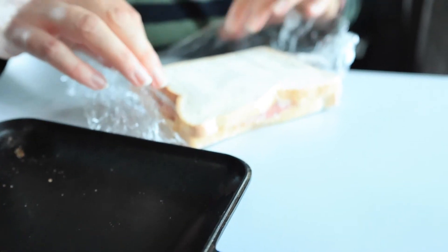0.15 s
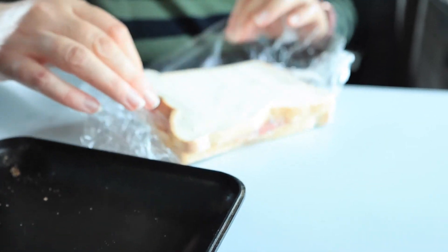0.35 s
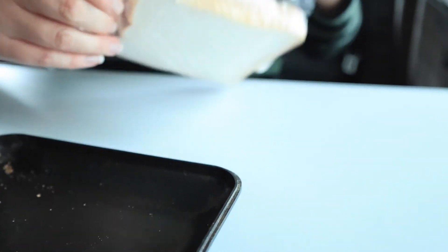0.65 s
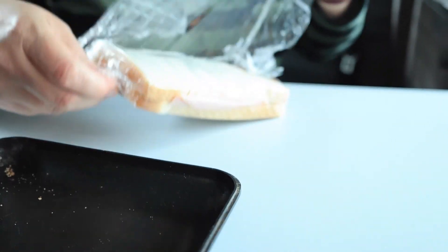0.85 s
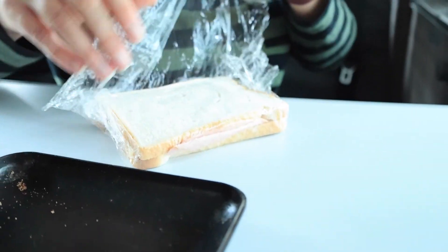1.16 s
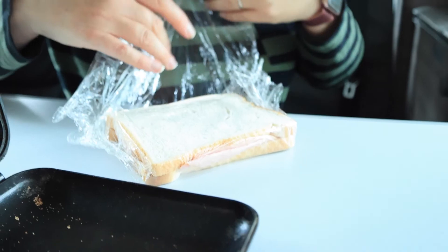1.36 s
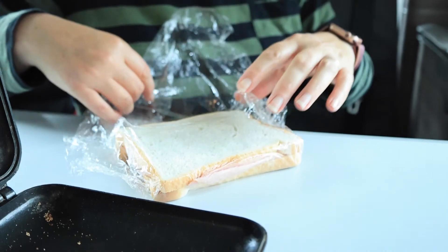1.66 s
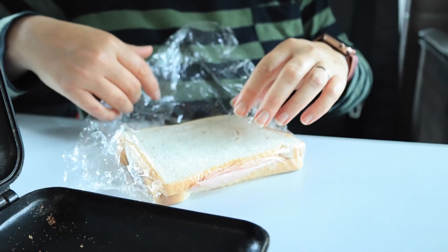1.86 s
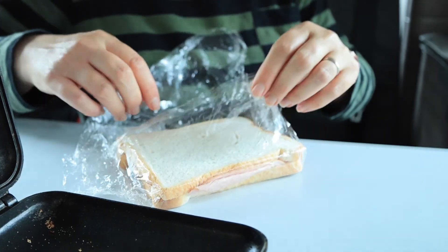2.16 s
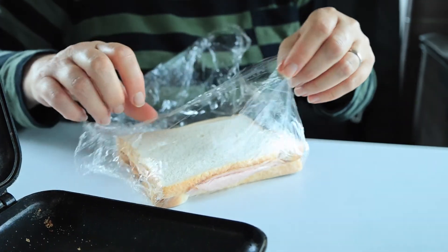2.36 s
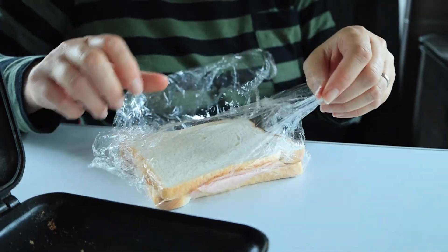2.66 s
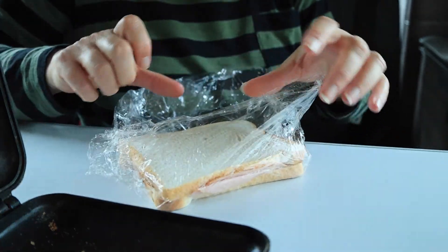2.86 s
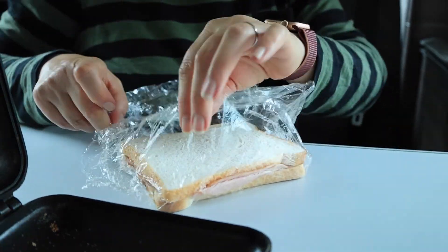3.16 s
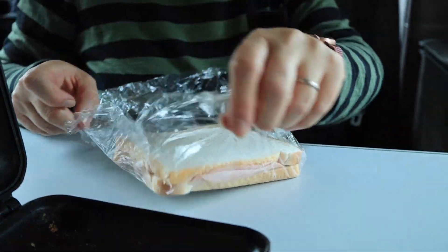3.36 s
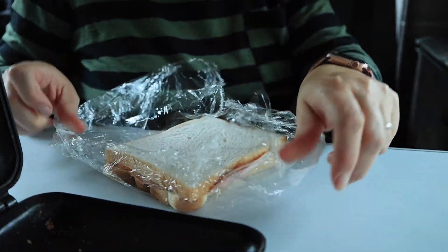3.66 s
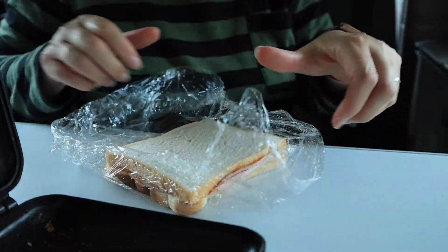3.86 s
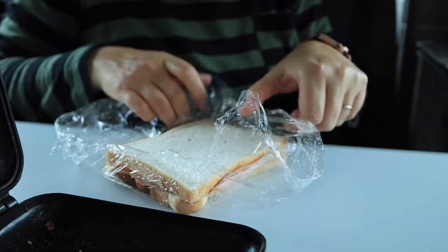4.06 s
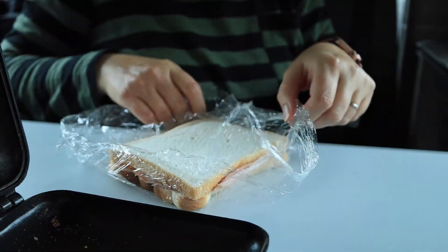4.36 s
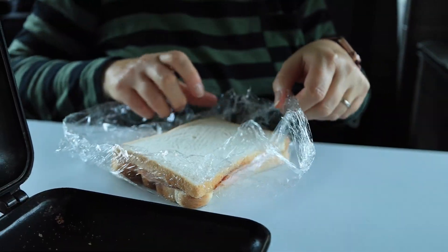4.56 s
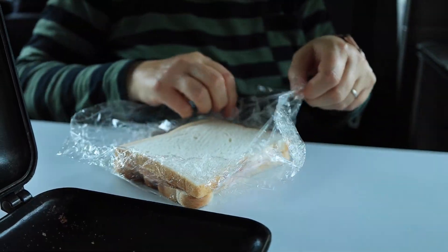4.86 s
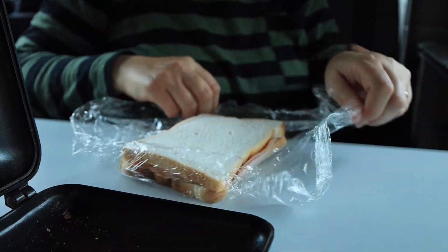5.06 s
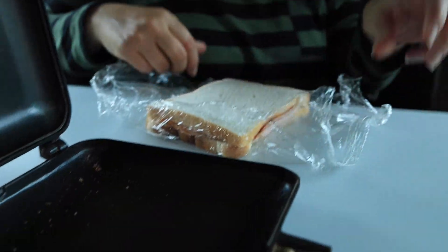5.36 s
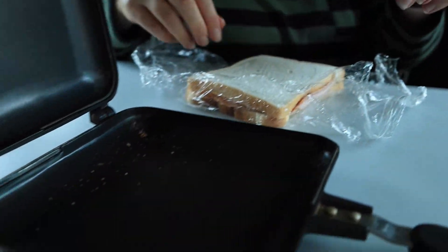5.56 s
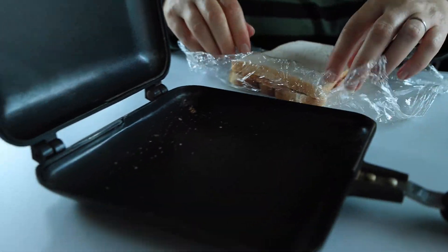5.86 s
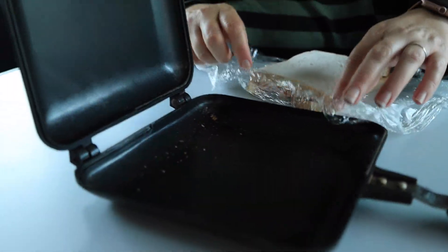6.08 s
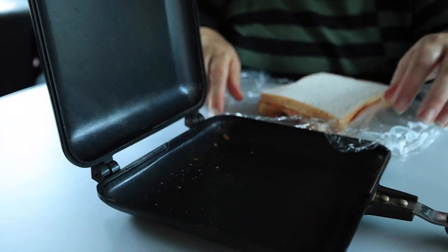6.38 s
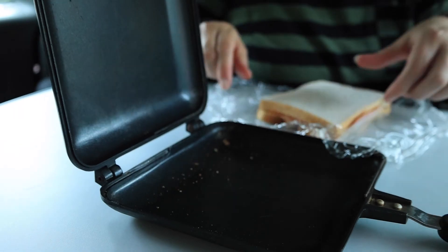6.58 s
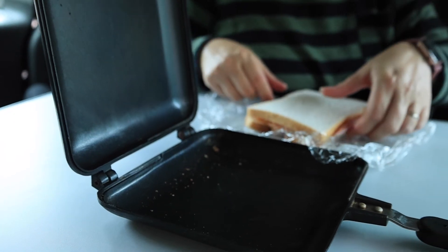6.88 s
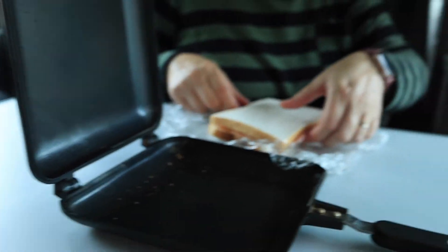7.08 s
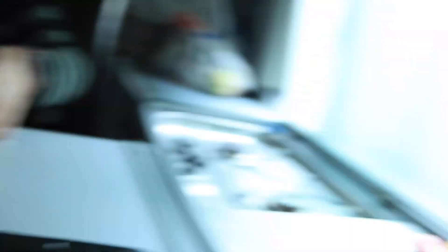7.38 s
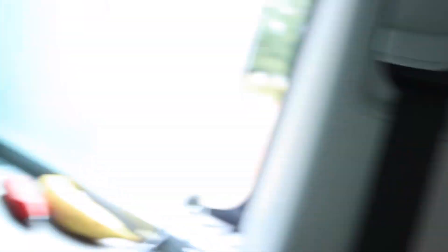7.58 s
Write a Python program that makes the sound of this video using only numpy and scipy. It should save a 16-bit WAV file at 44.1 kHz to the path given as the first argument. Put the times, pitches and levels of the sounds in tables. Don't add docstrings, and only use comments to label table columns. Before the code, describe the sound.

Crisp plastic film rustles in uneven tugs, with single creases popping brightly over the swarm of tiny crackles. An early thud on the table, a loud double snap past the middle, then quieter fumbling, a strong bump with a short drag, and a late catch clicking. Near, dry indoor sound; soft fan hush, with low bumps from fingers shifting on the microphone.

```python
import sys
import numpy as np
from scipy import signal
from scipy.fft import rfft, irfft
from scipy.io import wavfile
from scipy.ndimage import uniform_filter1d

SR = 44100
rng = np.random.default_rng(int(sys.argv[2]) if len(sys.argv) > 2 else 0)


def volts_from_db(level):
    exponent = np.asarray(level, float) / 20
    return 10 ** exponent


def dump(signal):
    limited = np.clip(np.atleast_2d(signal).T, -1, 1)
    pcm = np.round(limited * 32767).astype(np.int16)
    wavfile.write(sys.argv[1], SR, pcm)


N = 340628


def unit(x):
    return x / np.sqrt(np.mean(x ** 2))


def band(x, lo_hz, hi_hz, order=2):
    edges_hz = [lo_hz, min(hi_hz, .45 * SR)]
    return signal.sosfilt(signal.butter(order, edges_hz, "band", fs=SR, output="sos"), x)


def noise(n=N):
    return rng.standard_normal(n)


def curves(table):
    s, *columns = np.transpose(table)
    return [np.interp(np.arange(N) / SR, s, c) for c in columns]


def gestures(table):
    swing_db = 20
    t = np.arange(0, N / SR, .001)
    power = 0
    for s, hold, db, rise, fall in table:
        distance = np.maximum(s - t, 0) / rise + np.maximum(t - s - hold, 0) / fall
        power = power + volts_from_db(db - swing_db * distance) ** 2
    return np.interp(np.arange(N) / SR, t, np.sqrt(power))


def colour(x, spectrum):
    hz, db = np.transpose(spectrum)
    bins_hz = np.fft.rfftfreq(2048, 1 / SR)
    log_gain = np.interp(np.log(bins_hz + 1), np.log(hz), db) * np.log(10) / 20
    cepstrum = irfft(log_gain)
    cepstrum[1:1024] *= 2
    cepstrum[1025:] = 0
    return signal.fftconvolve(x, irfft(np.exp(rfft(cepstrum))))[:len(x)]


def walk(rate):
    k = int(SR / rate)
    steps = np.repeat(noise(N // k + 1), k)
    return unit(uniform_filter1d(uniform_filter1d(steps, k), k)[:N])


def fade(t60):
    t = np.arange(int(.3 * SR)) / SR
    return t, np.exp(-np.log(1000) * t / t60)


def ring(push, modes, shorten=1):
    t = fade(1)[0]
    body = 0
    for k, (hz, db, t60) in enumerate(modes):
        mode = np.sin(2 * np.pi * hz * t) * fade(t60 * shorten)[1]
        body = body + (-1) ** k * volts_from_db(db) * mode
    return signal.fftconvolve(push, body)[:len(t)]


def add(out, s, db, wave):
    i = int(s * SR)
    part = wave[:N - i]
    out[i:i + len(part)] += part * volts_from_db(db) / np.abs(wave).max()


def swarm(per_s, spread_db):
    size = volts_from_db(spread_db * np.minimum(rng.exponential(size=N), 3))
    return unit((rng.random(N) < per_s / SR) * np.sign(noise()) * size)


# frequency in Hz, density in dB per Hz.
HUSH_SPECTRUM = [(71, -19), (120, -10), (295, -9), (742, -7), (1070, -9.5), (1490, -7.5), (1750, -4.5),
                 (2290, -15.5), (7200, -27), (9590, -26), (16000, -34)]
# frequency in Hz, width in Hz, level in dB.
MOTOR_WHINES = [(3930, 350, -64), (9630, 220, -71.5)]


def air():
    sound = unit(colour(noise(), HUSH_SPECTRUM)) * volts_from_db(-44.5)
    fan = (1744, 236, -48.5 + .5 * walk(3.95))  # Hz, width Hz, unsteady dB
    for hz, width, db in MOTOR_WHINES + [fan]:
        sound = sound + volts_from_db(db) * unit(band(noise(), hz - width / 2, hz + width / 2))
    return sound


# start of full strength in seconds, hold in seconds,
# rumble level in dB, rise in seconds, fall in seconds.
GRIP_SHIFTS = [(0.46, 0.11, -34, .17, 0.29), (0.82, .01, -39, .3, 0.66), (1.7, .01, -52, .5, .1),
               (2.9, .01, -46, 0.23, 0.17), (3.67, .01, -48, 0.26, .5), (4.49, .01, -54, 0.43, 0.54),
               (5.25, 0.026, -37, 0.28, .22), (5.68, .01, -46.5, .5, 0.87), (6.32, .01, -50, 0.71, .6),
               (7.185, 0.12, -29, 0.049, 0.09), (7.46, 0.058, -30, .1, 0.17), (7.7, .03, -31.5, .3, 0.07)]


def grip(pull):
    hold_db, sway_db, drone_db = -62, -45, -49
    drone_shift_db, drone_pull_db = -16.5, -14
    shift = gestures(GRIP_SHIFTS)
    rumble = np.hypot(shift, volts_from_db(hold_db)) * unit(band(noise(), 27.7, 55, order=3))
    sway = volts_from_db(sway_db) * unit(band(noise(), 12.8, 19.9, order=3))
    moving = np.hypot(volts_from_db(drone_shift_db) * shift, volts_from_db(drone_pull_db) * pull)
    drone = np.hypot(volts_from_db(drone_db), moving) * unit(band(noise(), 57, 188.0))
    return rumble + sway + drone


# start of full strength in seconds, hold in seconds,
# rustle level in dB, rise in seconds, fall in seconds.
EDGE_FUMBLES = [(0.0, .01, -44.5, .01, .35), (0.18, 0.24, -50, 0.067, .1), (1.45, 0.25, -45, 0.15, .12),
                (1.95, .01, -49, 0.033, 0.2), (3.16, .01, -48, 0.13, 0.088), (4.03, 0.29, -49.5, .02, .1),
                (4.37, .03, -47.5, 0.14, .9), (5.85, 0.27, -46, 0.011, .1), (6.47, 0.032, -60, .1, .2),
                (6.756, 0.0084, -45.5, 0.058, 0.057), (6.865, 0.008, -45, .12, 0.054),
                (6.96, 0.096, -48.5, .1, 0.092), (7.16, .01, -48, 0.092, .2), (7.4, .01, -43, 0.29, 0.13),
                (7.65, 0.09, -47, 0.27, .1)]


def fumbling():
    return gestures(EDGE_FUMBLES)


# start of full strength in seconds, hold in seconds,
# rustle level in dB, rise in seconds, fall in seconds.
FIRM_PULLS = [(0.32, .01, -39, .01, .05), (0.375, .01, -36, .02, .1), (0.412, 0.015, -35, 0.022, 0.34),
              (0.571, .01, -29, 0.01, 0.2), (0.634, 0.004, -27, .006, 0.036), (0.71, .11, -29, 0.15, .04),
              (0.83, 0.11, -33, .03, 0.05), (1.07, 0.035, -33.5, 0.15, 0.061),
              (1.22, 0.15, -38, 0.33, 0.069), (1.705, 0.0092, -36.5, .03, 0.22),
              (2.07, 0.0045, -40.5, 0.017, 0.019), (2.18, 0.17, -34, 0.12, 0.13),
              (2.43, 0.0093, -31.5, 0.086, 0.098), (2.56, 0.097, -40, 0.27, 0.22),
              (3.21, 0.0091, -38, 0.089, .15), (3.3, .01, -29, 0.11, 0.27),
              (3.44, 0.13, -33.5, 0.052, 0.044), (3.645, 0.0098, -37.5, 0.083, 0.15),
              (4.79, 0.052, -37, 0.11, .1), (4.88, 0.28, -33, 0.12, 0.056), (5.18, 0.12, -42, .05, 0.12),
              (6.14, 0.26, -41, 0.19, 0.13)]


def pulling():
    return gestures(FIRM_PULLS)


# frequency in Hz, density in dB per Hz.
FILM_SPECTRUM = [(880, -19.5), (1500, 1), (1710, 1.5), (2910, 0), (5660, -1), (6240, -1.5), (9100, -1),
                 (15100, -9), (16000, -33)]
# start of full strength in seconds, hold in seconds,
# flap level in dB, rise in seconds, fall in seconds.
SHEET_BRUSHES = [
    (0.37, 0.27, -39.5, .05, .1),
    (0.85, 0.27, -43, .1, 0.12),
    (6.92, 0.26, -47, .08, .1),
    (7.27, .05, -56, .05, 0.11),
    (7.52, 0.25, -49.5, .05, .1),
]


def rustle(pull, fumble):
    folds_per_s, spread_db, hiss_db = 2500, 3.0, -6
    pull_flap_db, fumble_flap_db, settle_db = -7.5, -5, -61.5
    jerk = volts_from_db(.6 * walk(22) + 1.0 * walk(90))
    wide = swarm(folds_per_s / 8, spread_db)
    folds = 0
    for hz in 1200 * 2. ** np.arange(0, 4, .5):
        ticks = .5 * wide + swarm(folds_per_s, spread_db) + volts_from_db(hiss_db) * noise()
        folds = folds + volts_from_db(1.8 * walk(25)) * band(ticks, hz / 1.19, hz * 1.19, order=1)
    flap = band(.5 * wide + noise(), 306, 1200) * volts_from_db(0.79 * walk(25))
    fumble_slack = np.hypot(volts_from_db(fumble_flap_db) * fumble, gestures(SHEET_BRUSHES))
    slack = np.hypot(volts_from_db(pull_flap_db) * pull, fumble_slack)
    effort = np.hypot(pull, fumble) + volts_from_db(settle_db)
    return jerk * (effort * unit(colour(folds, FILM_SPECTRUM[:-1])) + slack * unit(flap))


# start in seconds, peak in dB, centre frequency in Hz.
SINGLE_CREASES = [(0.3743, -23, 5600), (0.4114, -13.5, 3800), (0.4227, -18, 5400), (0.456, -14.5, 5200),
                  (0.5706, -16, 5600), (0.5867, -19, 6100), (0.6025, -19, 6400), (0.6333, -8, 8700),
                  (0.7876, -16, 6200), (0.9318, -17, 8200), (1.1828, -20, 5600), (1.2178, -27, 5600),
                  (1.3374, -16, 4230), (1.7044, -19, 4900), (2.0742, -20, 4700), (2.3676, -15, 6400),
                  (2.595, -20, 5800), (2.6318, -22, 7200), (3.2057, -18.5, 6100), (3.2989, -21, 5900),
                  (3.4417, -14, 6700), (3.5076, -17, 6000), (4.887, -16, 5700), (4.9025, -15, 3880),
                  (4.9342, -16, 5800), (4.9454, -12, 9800), (5.0793, -10, 6500), (5.8435, -25, 8160),
                  (6.0521, -23, 8100), (6.7745, -30, 6000),
                  (0.218, -31, 4200), (0.365, -25, 3600), (0.3901, -23, 8900), (0.9136, -26, 4500),
                  (1.0086, -29, 4600), (1.1524, -20, 7300), (1.211, -19, 7500), (1.247, -25, 5700),
                  (1.3969, -26, 3900), (1.466, -23, 5400), (1.578, -27, 5800), (1.9538, -26, 5400),
                  (2.217, -16, 6800), (2.2672, -26, 5700), (2.6252, -24, 6300), (2.6523, -21, 6200),
                  (2.755, -25, 7000), (3.1094, -27, 8000), (3.5493, -23, 5000), (4.183, -29, 5630),
                  (4.2896, -32, 6660), (4.534, -30, 5100), (4.9773, -17, 8400), (5.9401, -27, 6100),
                  (6.0761, -24, 5000), (6.183, -25, 5600), (6.9808, -26, 8900), (7.3404, -27, 8600),
                  (7.4027, -23, 7000), (7.699, -24, 6000)]


def creases(effort):
    small_per_s, small_db, spray_db = 22, -21.5, -21
    out = volts_from_db(small_db) * effort * unit(band(swarm(small_per_s, 3.3), 2600, 12000))
    for s, db, hz in SINGLE_CREASES:
        t, decay = fade(0.025)
        push = volts_from_db(spray_db) * decay * noise(len(t))
        push[0] = rng.choice([-1, 1])
        add(out, s, db + 1, band(push, hz / 1.9, hz * 1.7))
    return out


# start in seconds, peak in dB, thud frequency in Hz,
# ring decay (t60) in seconds, bass weight in dB.
BLOWS = [(0.2991, 1, 763, 0.082, 2.5), (0.39, -22, 430, 0.036, 4), (0.784, -21, 530, 0.036, 3),
         (0.7915, -8.5, 643, 0.045, -0.5), (1.209, -27, 900, 0.011, -13), (2.427, -26, 880, .03, -14),
         (3.533, -25, 930, 0.027, -9), (5.0792, -17, 665, .03, -7), (5.272, -25, 308, 0.089, 14),
         (6.2781, -19.5, 1460, 0.062, 1), (6.2925, -3, 400, 0.1, -9), (6.8757, -19, 610, .05, -5.5),
         (7.1809, -12, 1090, 0.048, 6.5), (7.264, -27, 213, 0.05, 13), (7.699, -25, 1500, 0.053, -3),
         (7.1651, -20, 332, .04, 3), (7.4615, -29.5, 150, .04, 2), (5.128, -32, 130, .03, 8)]
# frequency in Hz, level in dB, decay (t60) in seconds.
TABLE_MODES = [(448, 0.5, 0.075), (589, -8, 0.11), (700, 4, 0.028), (880, 5, 0.023), (1075, 3.5, 0.023),
               (1433, -1.5, 0.023), (1730, -10.5, 0.048), (2310, -7, 0.026), (2800, -15, 0.027)]
# frequency in Hz, level in dB, decay (t60) in seconds.
BASS_MODES = [(219.7, -7.5, 0.16), (85, -3, 0.045), (338.6, -5.5, 0.06), (162, -16, 0.03)]


def knocks():
    crack_db, crack_per_bass = -13, -0.94
    out = np.zeros(N)
    for s, db, hz, t60, bass_db in BLOWS:
        t, decay = fade(0.074)
        push = decay * noise(len(t)) * 0.15
        push[:12] += np.hanning(12)
        table = ring(push, TABLE_MODES, t60 / 0.098) + volts_from_db(bass_db) * ring(push, BASS_MODES)
        add(out, s, db, table + ring(push, [(hz, 5, .025)]))
        crack = band(fade(0.056)[1] * noise(len(t)), 1700, 5660)
        add(out, s, db + crack_db + crack_per_bass * bass_db, crack)
    return out


# time in seconds, slip rate in Hz, level in dB.
SQUEAK_PATH = [
    (3.64, 1517, -90),
    (3.655, 1496, -38),
    (3.69, 1450, -42),
    (3.715, 1520, -38),
    (3.735, 1600, -90),
]


def squeak():
    hz, db = curves(SQUEAK_PATH)
    phase = 2 * np.pi * np.cumsum(hz * (1 + 0.089 * walk(300))) / SR
    return volts_from_db(db + 2.0 * walk(150)) * (np.sin(phase) + 0.5 * np.sin(2 * phase))


# start in seconds, peak in dB, top frequency in Hz,
# tail decay (t60) in seconds.
FILM_SNAPS = [
    (5.1480, 3, 6800, 0.031),
    (5.1561, 3, 4070, 0.024),
]


def snaps():
    out = np.zeros(N)
    for s, db, top_hz, t60 in FILM_SNAPS:
        t, decay = fade(t60)
        push = volts_from_db(-15) * decay * noise(len(t)) * (t > .0002)
        push[:6] = -np.hanning(8)[1:-1]
        add(out, s, db, band(push, 370, top_hz, order=1))
    return out


# time in seconds, drag level in dB, crushed film level in dB.
DRAG_PATH = [
    (6.295, -95, -95),
    (6.30, -55, -45),
    (6.31, -27, -36),
    (6.33, -30, -39),
    (6.35, -29.5, -33),
    (6.37, -28.5, -47),
    (6.385, -34.5, -48),
    (6.395, -57, -62),
    (6.42, -95, -95),
]
# frequency in Hz, width in Hz, level in dB.
DRAGGED_BODY = [(437, 110, 2), (1370, 270, -1.5), (1750, 130, -2), (2800, 140, -5), (3260, 150, -20)]


def slide():
    drag_db, crush_db = curves(DRAG_PATH)
    grit = swarm(900, 3.9) + 0.46 * noise()
    body = 0
    for hz, width, db in DRAGGED_BODY:
        body = body + volts_from_db(db) * band(grit, hz - width / 2, hz + width / 2, order=1)
    drag = unit(body) + 0.59 * unit(band(grit, 260, 710)) + 0.28 * unit(band(grit, 900, 4700))
    return volts_from_db(drag_db) * drag + volts_from_db(crush_db) * unit(band(grit, 4600, 11600, order=1))


# start in seconds, peak in dB, rattle rise in seconds,
# rattle decay (t60) in seconds, metal ring relative level in dB.
CATCH_CLICKS = [
    (7.165, -17.5, 0.0009, 0.038, -19),
    (7.1806, -9, 0.00038, 0.017, -8),
    (7.455, -30, 0.0012, 0.061, -7),
    (7.4609, -13, .003, 0.043, -2),
]
# frequency in Hz, level in dB, decay (t60) in seconds.
CATCH_MODES = [(1000, -24, .02), (2000, -21, .015), (2520, 1, 0.009), (4310, 2, 0.045), (4540, 2, 0.05),
               (4820, -2, 0.03), (6060, 2, 0.024), (7730, 7.5, .015), (9800, -21, .012)]


def catch():
    out = np.zeros(N)
    for s, db, rise, t60, metal_db in CATCH_CLICKS:
        t, decay = fade(t60)
        rattle = (1 - np.exp(-t / rise)) * decay * noise(len(t))
        metal = volts_from_db(metal_db) * unit(ring(rattle, CATCH_MODES))
        add(out, s, db, metal + unit(band(rattle, 340, 6300)))
    return out


def room(x):
    t60_s, level_db, dull_hz = 0.15, -18.5, 6000
    t, decay = fade(t60_s)
    tail = band(noise(len(t)), 100, dull_hz, order=1) * decay * (t > .003)
    return x + volts_from_db(level_db) * signal.fftconvolve(x, tail / np.sqrt(np.sum(tail ** 2)))[:N]


def scene():
    pull, fumble = pulling(), fumbling()
    film = rustle(pull, fumble) + creases(np.hypot(pull, fumble)) + snaps() + squeak()
    return (room(film + knocks() + slide() + catch()) + grip(pull) + air())[None]


def roll_off(x):
    return signal.sosfilt(signal.butter(12, 16560, fs=SR, output="sos"), x)


def record(dry):
    top_cut = signal.ellip(10, .3, 60, 15850, fs=SR, output="sos")
    mix = signal.sosfilt(top_cut, np.tanh(dry))
    return roll_off(mix)


dry = scene()
out = record(dry)
dump(out)
```